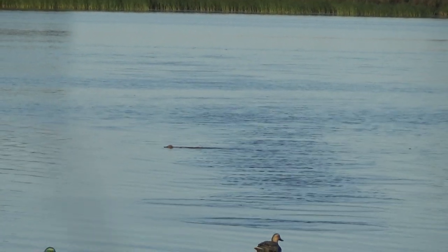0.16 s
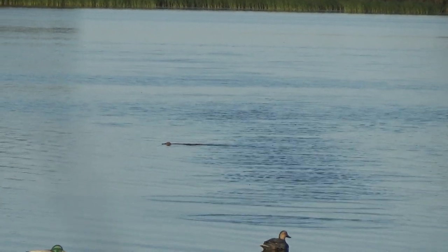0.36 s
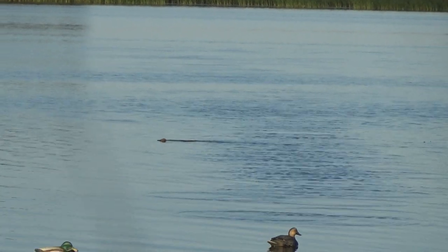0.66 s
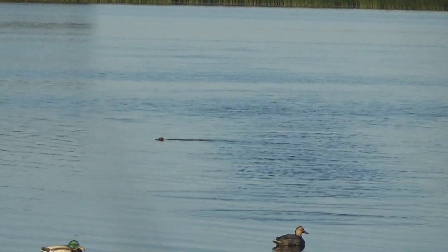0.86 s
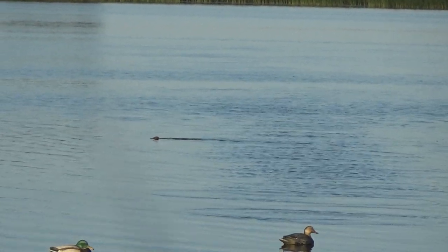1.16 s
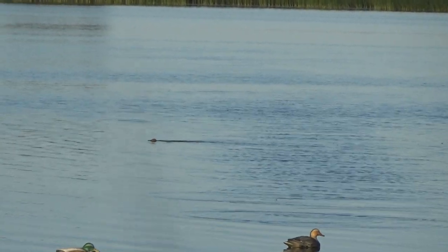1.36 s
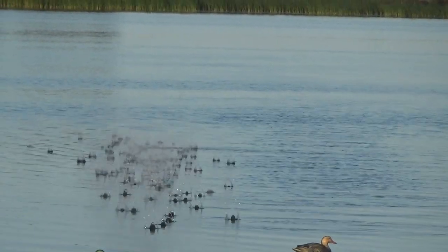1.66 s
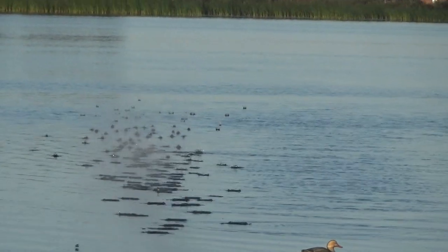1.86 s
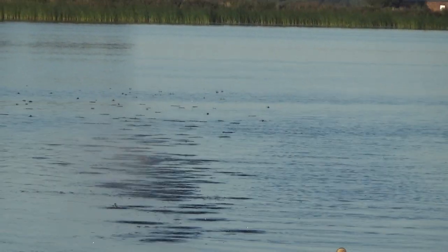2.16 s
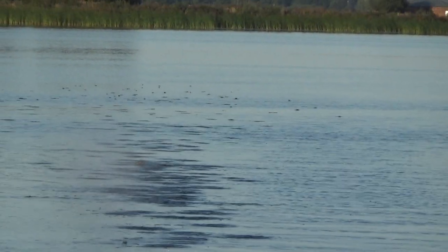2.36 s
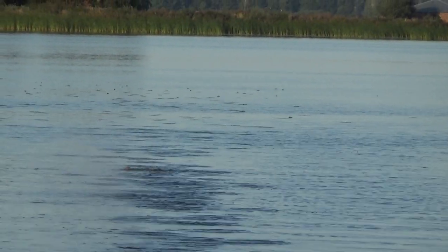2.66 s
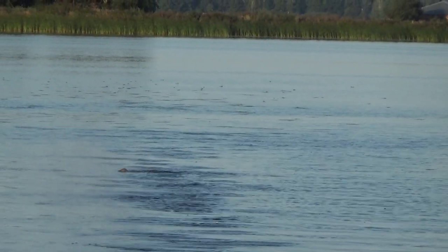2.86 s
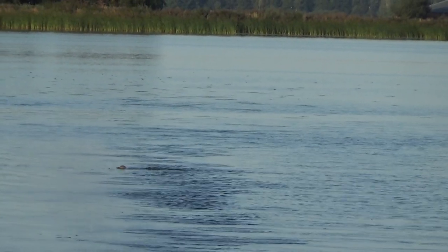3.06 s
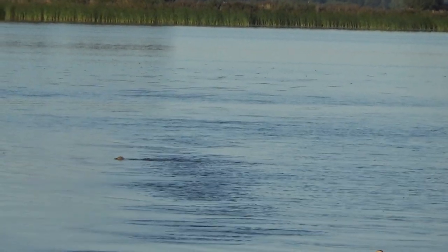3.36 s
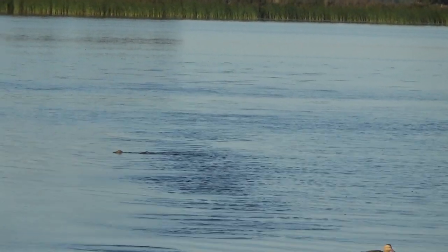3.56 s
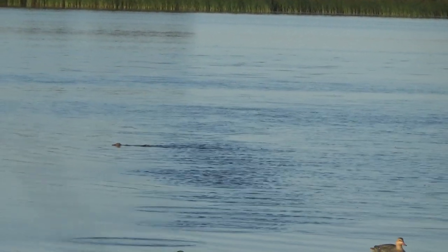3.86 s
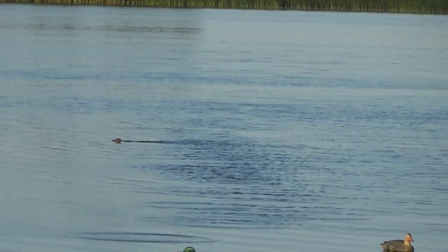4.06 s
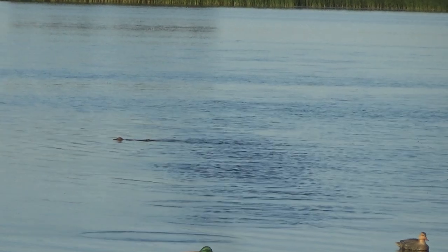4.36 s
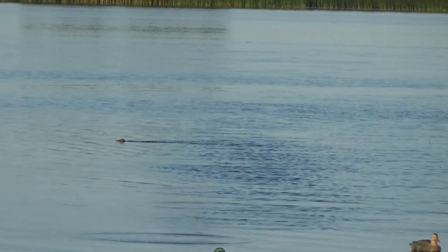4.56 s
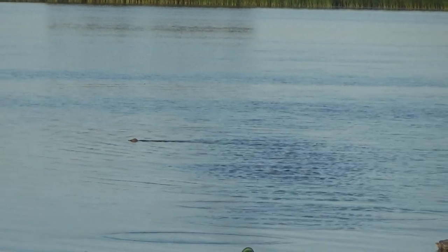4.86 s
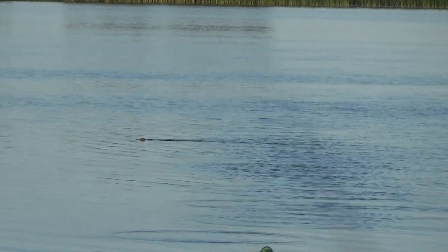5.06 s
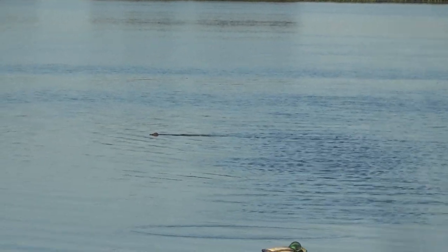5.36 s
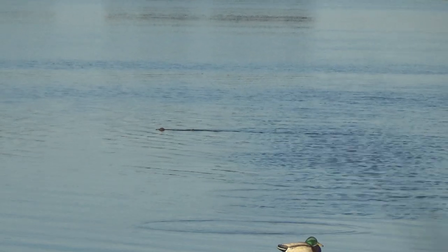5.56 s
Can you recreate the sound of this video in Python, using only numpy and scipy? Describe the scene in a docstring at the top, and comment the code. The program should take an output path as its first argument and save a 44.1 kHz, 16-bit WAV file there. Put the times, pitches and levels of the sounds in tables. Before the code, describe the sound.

Quiet open air over a marsh pond, with the soft rolling echo of an earlier shot dying away. Tiny dry ticks of hands on a gun come at about 0.15, 0.5, 0.95 and 1.2 seconds. Just before 1.4 a very close shotgun blast bursts out, harsh and tearing with a short low thump, overloading the microphone; its roar and reed reflections collapse within half a second. From 1.55 to 1.95 pellets plop and spatter densely into the water, with thin spray falling after, while the barrel leaves a faint high ring. At 2.0 to 2.5 the empty shell knocks and tumbles lightly, slightly right. A hazy whisper returns from the reeds, and from about 2.8 echoes swell from the banks, strongest around 3.7 to 4.2 with a few soft slaps, then fade slowly. From 4.1 clothing rustles faintly; gear knocks and clicks on the left at 4.7 to 5.2, with a last tick near 5.45.

```python
"""A close shotgun blast over a marsh pond: bursts of coloured noise, so loud that the peaks overload.
The barrel rings faintly as one sine, pellets patter into the water as short rings, cracks and ticks,
and the empty shell drops to the right. Echoes roll back from the far banks as swelling noise bands
(an earlier shot's echo is dying at the start). Tiny ticks of the hands on the gun come before the shot
and near the end; late on, hissing noise makes the shooter's clothing rustle, all over quiet open air."""
import sys
import numpy as np
from scipy import signal
from scipy.fft import rfft, irfft
from scipy.io import wavfile

SR = 44100
rng = np.random.default_rng(int(sys.argv[2]) if len(sys.argv) > 2 else 0)


def materialize(psi):
    """Save the field psi as 16-bit PCM at rate SR to the path in sys.argv[1].

    A 1-D psi becomes a single channel; in a 2-D psi each row is a channel.
    """
    bounded = np.clip(np.atleast_2d(psi).T, -1, 1)
    quanta = np.round(bounded * 32767).astype(np.int16)
    wavfile.write(sys.argv[1], SR, quanta)


N = 251811  # length in samples
T = np.arange(N) / SR  # time in seconds
BIN_HZ = np.maximum(np.arange(N // 2 + 1) * SR / N, 1)  # frequency of each spectrum bin

# In all tables a level is a starting balance; t60 is the time to fade by 60 dB.
# Colours, the relative strength of low and high sound: [f/Hz, level/dB]
AIR_COLOUR = [(25, -23.5), (60, -24), (130, -19), (270, -3.5), (600, -2.5), (1000, -7.5), (2300, -14),
              (5000, -14.5), (11000, -21)]
ECHO_COLOUR = [(60, -46), (120, -27.5), (190, -8.5), (300, 0), (600, 0.5), (850, 0), (1200, -1), (1700, 2),
               (2400, 1), (3400, -1.5), (5000, -11.5), (10000, -23.5)]
WHISPER_COLOUR = [(300, -30.5), (550, -8.5), (800, 1), (1150, -4.5), (1750, -3), (2200, -14.5), (3000, -17),
                  (6000, -41)]
RUSTLE_COLOUR = [(800, -15), (2000, -3.5), (3500, 1.5), (5500, -0.5), (8000, -5), (11000, -12.5)]
TUMBLE_COLOUR = [(900, -20), (1800, -3), (3200, 3), (4800, -3), (7000, -11), (11000, -18)]
PATTER_COLOUR = [(88, -66), (150, -36), (446, -11), (630, -6.5), (991, -14), (1400, -4), (2330, -8),
                 (4310, -8.5), (6320, -14), (8600, -18), (11500, -40.5), (15000, -68.5), (22000, -120)]
BLAST_COLOUR = [(40, -36.5), (100, -27), (300, -18), (600, -8), (900, -2), (1450, 0.5), (1900, -2.5),
                (2700, -3.5), (4500, -4), (6500, -7.5), (9000, -6), (11000, -11.5)]
THUMP_COLOUR = [(25, -26), (60, -18), (120, -10.5), (200, -19), (270, -2.5), (490, -0.5), (720, -0.5),
                (900, -3.5), (1600, -17.5), (4000, -49.5)]
ROAR_COLOUR = [(59, -67.5), (100, -38.5), (359, -19.5), (553, -18), (623, -9), (804, -15), (1310, -4),
               (1570, -5), (2030, -2), (2520, -5), (4110, -1.5), (5110, -3), (6470, -2), (9970, -5),
               (11000, -11.5), (14300, -40), (22000, -120)]
TAIL_COLOUR = [(100, -48.5), (300, -22), (600, -12.5), (1300, -4), (2400, -1), (4200, 1), (7000, -2.5),
               (9000, -7), (11000, -12.5)]
REEDS_COLOUR = [(100, -49), (220, -21.5), (350, -7), (520, -0.5), (700, -1.5), (880, -9), (1050, -0.5),
                (1400, -1), (2000, -6.5), (3500, -22)]
MARSH_COLOUR = [(59, -72), (100, -42.5), (265, -20), (292, -11), (409, -10), (621, -1), (1490, -5),
                (2590, -14), (4610, -19), (8540, -29), (11500, -40), (15000, -70.5), (22000, -120)]
# Shots that the banks answer, an earlier one and the close one: [t/s, level/dB]
SHOTS = [(-2.705, -2.5), (1.3861, 0)]
# Echoes of any shot, from the nearest bank to the far distance: [delay after the shot t/s, level/dB,
# rise t/s, hold t/s, t60/s, upper band against body level/dB, left minus right level/dB]
BANKS = [(1.418, -45.7, .034, .12, 2.6, -3.4, -5.4), (1.757, -48.5, .05, .07, 3.3, -9.2, 1.5),
         (2.19, -58.4, .1, .24, 2.1, 2.6, 3), (2.31, -43.3, .033, .24, 2.2, -4.2, 3),
         (2.377, -41.3, .23, .355, 2.3, -9.8, 4.5), (2.82, -55.5, .43, 1.7, 8.2, -6.5, 2.2)]
# How alike the echoes are on both sides: [f/Hz, likeness 0 to 1]
ECHO_LIKENESS = [(200, 0.95), (600, 0.99), (1200, 0.95), (2400, 0.66), (8000, 0.25)]
# Single reflections that stand out of the roll: [t/s, level/dB]
SLAPS = [(3.97, -30.5), (4.057, -36), (4.088, -34), (4.144, -32.5), (4.202, -36)]
# Swells of the whisper scattered back by the reed beds: [t/s, level/dB, rise t/s]
REED_BEDS = [(2.33, -58.6, .27), (2.79, -51.5, .14)]
# Arm movements that make the sleeve rustle: [t/s, level/dB, rise t/s, hold t/s]
ARM_MOVES = [(4.1, -68.9, .45, 1.5), (4.823, -65.4, 0.065, .47)]
# Tiny dry ticks of the hands on the gun: [t/s, level/dB]
GRIP_TICKS = [(.151, -52), (.485, -59), (.953, -58), (1.21, -56.5), (4.989, -50), (5.451, -50.5)]
# Shell and gear knocks: [t/s, level/dB, ring f/Hz, treble level/dB, left minus right level/dB]
KNOCKS = [(2.036, -32, 1456, -63, 1.5), (2.21, -46, 1120, -61, .5), (2.247, -35, 4160, -42, -3),
          (2.251, -30, 1565, -38, -3.5), (2.403, -43, 3750, -63, 2), (2.459, -41, 3540, -63, -2.5),
          (4.739, -38, 1350, -67.5, 4), (4.973, -35.5, 4350, -55, 5), (5.133, -44, 969, -47, 5),
          (5.155, -36.5, 2250, -39, 4)]
# The loudest pellets hitting the water: [t/s, level/dB, plop f/Hz, treble level/dB]
PELLETS = [(1.547, -11, 1460, -22), (1.577, -16, 1390, -27), (1.597, -10.5, 2440, -36),
           (1.608, -14, 2360, -47), (1.634, -22, 1350, -46), (1.673, -23, 1360, -33),
           (1.705, -10.5, 1334, -36), (1.735, -22, 1940, -31), (1.772, -17, 2040, -38),
           (1.778, -17.5, 3040, -39), (1.785, -13.5, 1400, -24), (1.802, -20.5, 1425, -30),
           (1.828, -28.5, 1130, -40), (1.848, -30, 1930, -39), (1.867, -28, 5970, -35),
           (1.898, -30.5, 1470, -37), (1.926, -30.5, 1820, -38.5)]
# Surges of the muzzle blast: [t/s, level/dB, hold t/s, t60/s]
BLAST_SURGES = [(1.3664, -24, 0.0012, .012), (1.37, -25, 0.0024, 0.026), (1.373, -9, .009, 0.024),
                (1.3837, -13, .003, 0.017), (1.3895, -12.5, .006, .04), (1.403, -15, .003, .02)]
# Narrow resonances that colour the blast: [f/Hz, width f/Hz, level/dB]
BLAST_PEAKS = [(500, 51, -3), (1500, 48, 0.5), (2427, 30, -1.5), (3960, 75, -1.5), (4700, 53, 0),
               (5820, 76, -3), (6300, 72, -2), (6930, 70, -2), (7420, 240, -4), (8630, 140, -1)]
# Phase shift between the two microphone ports: [f/Hz, left lead in radians]
PORT_PHASE = [(40, -0.23), (250, -0.0048), (600, -.6), (1200, -0.86), (2300, -0.37), (4500, -0.23),
              (9000, -0.31)]

AIR_DB = -65
# each echo loses this much of its upper band, over about this time
DULLING_DB, DULLING_S = 3.6, .12
WHISPER_HOLD_S, WHISPER_T60_S = .4, 3.4
RUSTLE_T60_S, GRIP_T60_S = 2, .022
# the shell tumbles on after landing, then settles
TUMBLE_START_S, TUMBLE_HOLD_S, TUMBLE_T60_S, TUMBLE_DB = 2.26, .22, 1.6, -66.5
# the main cloud of pellets lands together; the spray that it throws up falls back for longer
CLOUD_START_S, CLOUD_RISE_S, CLOUD_HOLD_S, CLOUD_T60_S, CLOUD_DB = 1.665, .028, .13, .34, -39.5
SPRAY_T60_S, SPRAY_DB, PELLET_PAN_DB = 3.2, -62.5, 2
BARREL_HZ, BARREL_DB, BARREL_T60_S = 4500, -39.7, 1.8
MIC_LOW_HZ, CUTOFF_HZ = 36, 11200
OVERLOAD_LEVEL = .76  # the overload bends peaks so that they never pass this


def from_db(db):
    """Turn decibels into a gain."""
    return 10 ** (np.asarray(db) / 20)


def rms_one(x):
    """Scale a sound to an average power of 1."""
    return x / np.sqrt(np.mean(x ** 2) + 1e-20)


def at_hz(points, hz):
    """Read a table at any frequency, along a logarithmic frequency axis."""
    table = np.array(points)
    return np.interp(np.log(hz), np.log(table[:, 0]), table[:, 1])


def panned(lean_db):
    """Left and right gains for a level difference; positive leans left."""
    return from_db(np.array([[.5], [-.5]]) * lean_db)


def drift(rate_hz):
    """Random wandering with a spread of 1, mostly slower than the given rate."""
    spectrum = rfft(rng.standard_normal(N))
    return rms_one(irfft(spectrum / (1 + (BIN_HZ / rate_hz) ** 2), N))


def pair(alike):
    """Stereo white noise; likeness 1 makes both sides the same, 0 makes them independent."""
    mid, side = rng.standard_normal((2, N))
    alike = np.clip(alike, 0, 1)
    shared = np.sqrt((1 + alike) / 2) * mid
    opposite = np.sqrt((1 - alike) / 2) * side * [[1], [-1]]
    return shared + opposite


def coloured(x, colour):
    """Reshape the spectrum of a steady sound and scale it to power 1."""
    return rms_one(irfft(rfft(x) * from_db(at_hz(colour, BIN_HZ)), N))


def surge(start, hold, t60, rise=0.0008):
    """Loudness curve that rises, holds and dies away; the hold counts from the start."""
    age = T - start
    fade_db = np.clip(60 * (age - hold) / t60, 0, 300)
    return np.clip(age / rise, 0, 1) * from_db(-fade_db)


def low_cut(x, hz):
    """Remove sound below a frequency with a third-order high-pass."""
    return signal.sosfilt(signal.butter(3, hz, "high", fs=SR, output="sos"), x + 1e-18)


def band_pass(x, low_hz, high_hz, order=2):
    """Keep the sound between two frequencies."""
    return signal.sosfilt(signal.butter(order, [low_hz, high_hz], "band", fs=SR, output="sos"), x)


def resonant(x, peaks, peak_db):
    """Add narrow resonances, each a small filter that rings at its own pitch."""
    out = x
    for hz, width_hz, db in peaks:
        r = np.exp(-np.pi * width_hz / SR)  # a narrower peak rings longer
        feed = [(1 - r * r) / 2, 0, (r * r - 1) / 2]
        feedback = [1, -2 * r * np.cos(2 * np.pi * hz / SR), r * r]
        out = out + from_db(db + peak_db) * signal.lfilter(feed, feedback, x)
    return out


def ticks(per_s, spread_db, colour):
    """Random ticks of uneven size, each ringing in a pitch band of its own; power 1."""
    out, centres = 0, np.geomspace(500, 9000, 9)
    for hz in centres:
        happens = rng.random(N) < per_s / len(centres) / SR
        size = from_db(spread_db * np.minimum(rng.exponential(1, N), 3))
        clicks = happens * size * pair(.93)
        out = out + band_pass(clicks + 1e-18, hz / 1.3, hz * 1.3)
    return coloured(out, colour)


def hits(rows, ring_db, cycles, crack_db, crack_t60, scatter_db, scatter_t60, low_hz):
    """Each hit is a damped ring and a bright crack with a short scatter; small things give no bass."""
    out, age = np.zeros((2, N)), T[:SR // 8]
    for s, level_db, hz, treble_db, lean_db in rows:
        white = rng.standard_normal((3, len(age)))
        # the ring fades by 60 dB within the given number of cycles
        ring_fade = from_db(-60 * np.minimum(age * hz / cycles, 5))
        ring = from_db(level_db + ring_db) * np.sin(2 * np.pi * hz * age) * ring_fade
        bright = rms_one(band_pass(white[0], 2600, 8000))
        crack = from_db(treble_db + crack_db) * bright * from_db(-60 * age / crack_t60)
        broad = rms_one(band_pass(white[1:] + white[0], 700, 4500))
        scatter = from_db(level_db + scatter_db) * broad * from_db(-60 * age / scatter_t60)
        at = round((s + 0.00086) * SR)
        hit = panned(lean_db) * (ring + crack + scatter)
        out[:, at:at + len(age)] += hit[:, :N - at]
    return low_cut(out, low_hz)


def open_air():
    """Quiet open air is a steady noise, strongest in the lower middle."""
    return from_db(AIR_DB) * coloured(pair(0.44), AIR_COLOUR)


def bank_answers():
    """Each bank answers each shot with a swell that dulls with time; the powers of all swells add.

    Gives the body and upper band levels and the left minus right lean, all in dB."""
    body, upper, lean = 1e-12, 1e-13, 0
    for fired, shot_db in SHOTS:
        for delay, db, rise, hold, t60, upper_db, lean_db in BANKS:
            arrival = fired + delay
            power = (from_db(shot_db + db) * surge(arrival, hold, t60, rise)) ** 2
            dulled_db = DULLING_DB * (1 - np.exp(-np.maximum(T - arrival, 0) / DULLING_S))
            body = body + power
            upper = upper + power * from_db(upper_db - dulled_db) ** 2
            lean = lean + power * lean_db
    return 10 * np.log10(body), 10 * np.log10(upper), lean / body


def echoes():
    """Countless reflections merge into a lumpy roll; air soaks up the treble of the longer paths."""
    body_db, upper_db, lean_db = bank_answers()
    lumps = drift(60)
    treble_loss_db = np.minimum(upper_db - body_db - 4.5, -3)
    edges = 45 * 2 ** np.arange(0, 8.1, .5)  # half-octave bands
    roll = 0
    for low, high in zip(edges, edges[1:]):
        hz = np.sqrt(low * high)
        band = band_pass(pair(at_hz(ECHO_LIKENESS, hz)), low, high, order=3)
        # only bands above 750 Hz lose treble, and higher bands lose more
        dulling_db = treble_loss_db * np.clip(np.log2(hz / 750) / 1.195, 0, 1.9)
        lean = panned(lean_db * min(hz / 700, 1.2))  # bass leans less
        roll = roll + band * from_db(at_hz(ECHO_COLOUR, hz) + dulling_db) * lean
    slap_surges = sum(from_db(db + 6) * surge(s, 0.0035, .022, rise=.001) for s, db in SLAPS)
    slaps = low_cut(roll * slap_surges, 337)
    swells = sum(from_db(db) * surge(s, WHISPER_HOLD_S, WHISPER_T60_S, rise) for s, db, rise in REED_BEDS)
    whisper = coloured(pair(.8), WHISPER_COLOUR) * swells * panned(-4)
    return roll * from_db(body_db + 12.0 + 1.3 * lumps) + slaps + whisper


def sleeve_and_grip():
    """Cloth slides in a fine, grainy hiss late on; grip ticks come before the shot and near the end."""
    moves = sum(from_db(db) * surge(s, hold, RUSTLE_T60_S, rise) for s, db, rise, hold in ARM_MOVES)
    grain_db = 1.5 * drift(70) + 1.5 * drift(9)
    cloth = moves * from_db(grain_db) * panned(4)
    grip = sum(from_db(db) * surge(s, 0, GRIP_T60_S) for s, db in GRIP_TICKS)
    return coloured(pair(0.79), RUSTLE_COLOUR) * (cloth + grip)


def shell_tumble():
    """The landed shell tumbles on as a thin run of random ticks, then settles."""
    fading = from_db(TUMBLE_DB) * surge(TUMBLE_START_S, TUMBLE_HOLD_S, TUMBLE_T60_S)
    return ticks(900, spread_db=2.5, colour=TUMBLE_COLOUR) * fading * panned(-1.95)


def shell_and_gear_knocks():
    """The shell and the gear knock: short rings with a crack and a scatter."""
    return hits(KNOCKS, ring_db=-4, cycles=29, crack_db=-1, crack_t60=0.018,
                scatter_db=-11.5, scatter_t60=0.069, low_hz=700)


def pellets():
    """Single loud plops stand out of a dense spatter of small ones; the spray falls back after them."""
    cloud = from_db(CLOUD_DB) * surge(CLOUD_START_S, CLOUD_HOLD_S, CLOUD_T60_S, rise=CLOUD_RISE_S)
    spray = from_db(SPRAY_DB) * surge(CLOUD_START_S + CLOUD_HOLD_S, 0, SPRAY_T60_S)
    patter = ticks(3200, spread_db=3.0, colour=PATTER_COLOUR)
    spatter = patter * (cloud + spray) * panned(PELLET_PAN_DB)
    rows = [(*pellet, PELLET_PAN_DB) for pellet in PELLETS]
    plops = hits(rows, ring_db=-3.5, cycles=12.5, crack_db=1, crack_t60=0.0087,
                 scatter_db=-15.5, scatter_t60=0.0245, low_hz=514.6)
    return spatter + plops


def barrel():
    """The steel keeps one thin ringing note, a fading sine."""
    return from_db(BARREL_DB) * np.sin(2 * np.pi * BARREL_HZ * T) * surge(1.38, 0, BARREL_T60_S)


def shot():
    """A tearing blast with a low thump, a held roar, a slap from the near reeds and the marsh's answer."""
    tear = coloured(pair(0.52) * from_db(2 * drift(500)), BLAST_COLOUR)
    blast = tear * sum(from_db(db + 1) * surge(s, hold, t60) for s, db, hold, t60 in BLAST_SURGES)

    thump = from_db(-16.0) * coloured(pair(.2), THUMP_COLOUR) * surge(1.382, 0.0082, 0.086, rise=0.0068)

    held = from_db(-16.5) * surge(1.392, .076, 0.067, rise=.003)
    held = held + from_db(-16.0) * surge(1.4757, .006, .055)
    roar = coloured(pair(.92), ROAR_COLOUR) * from_db(1.2 * drift(120)) * held

    # in the three later layers the drift makes the level uneven
    tail = coloured(pair(.92), TAIL_COLOUR) * from_db(-26 + 1.4 * drift(100))
    tail = tail * surge(1.47, .045, 0.39, rise=0.017)
    reeds = coloured(pair(0.95), REEDS_COLOUR) * from_db(-29.5 + 2.5 * drift(90))
    reeds = reeds * surge(1.503, 0.043, 0.27, rise=0.015)
    marsh = coloured(pair(.8), MARSH_COLOUR) * from_db(-44 + 1.5 * drift(40))
    marsh = marsh * surge(1.58, 0.17, 1.6, rise=0.099)

    near = low_cut(resonant(blast + thump + roar, BLAST_PEAKS, peak_db=-2.5), 32)
    return (near + low_cut(tail + reeds, 220)) * panned(0.56) + marsh * panned(3)


def scene():
    """Add all sources, from the quiet open air up to the shot."""
    background = open_air() + echoes() + sleeve_and_grip()
    small_sounds = shell_tumble() + shell_and_gear_knocks() + pellets()
    return background + small_sounds + barrel() + shot()


def record(dry):
    """Close-set ports shift the phase between the sides, peaks overload, deep bass and top are cut."""
    half_shift = .5j * at_hz(PORT_PHASE, BIN_HZ)  # half of the shift goes to each side
    ports = irfft(rfft(dry) * np.exp(half_shift * np.array([[1], [-1]])), N)
    loaded = OVERLOAD_LEVEL * np.tanh(ports / OVERLOAD_LEVEL)
    loaded = low_cut(loaded, MIC_LOW_HZ)
    top_cut = np.sqrt(1 + (BIN_HZ / CUTOFF_HZ) ** 260)  # a very steep edge
    return irfft(rfft(loaded) / top_cut, N)


dry = scene()
out = record(dry)
materialize(out)
```